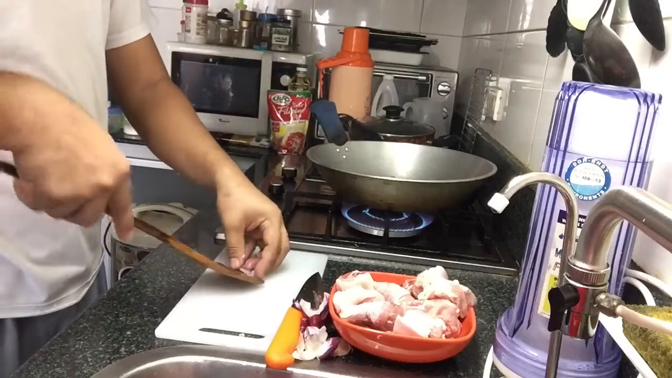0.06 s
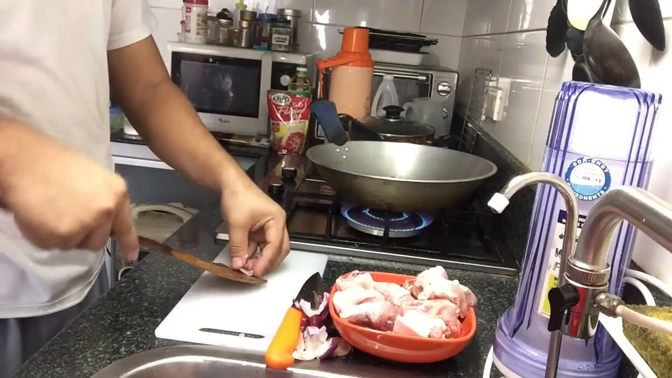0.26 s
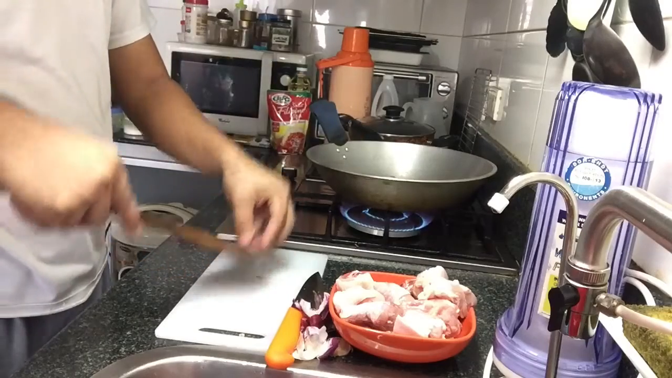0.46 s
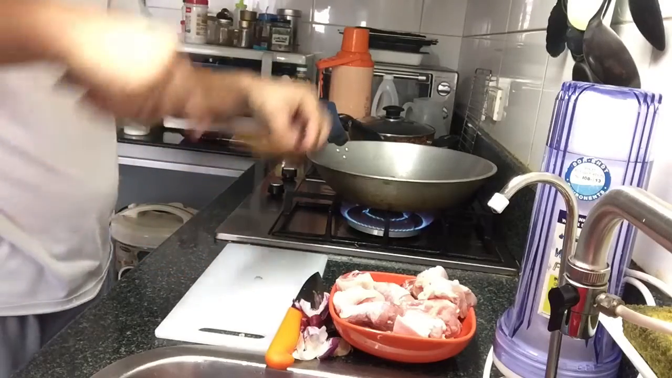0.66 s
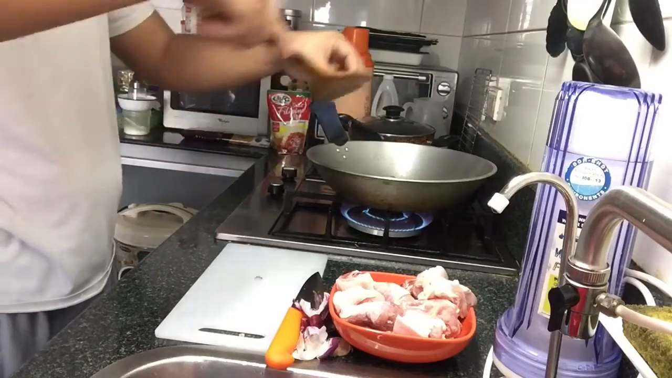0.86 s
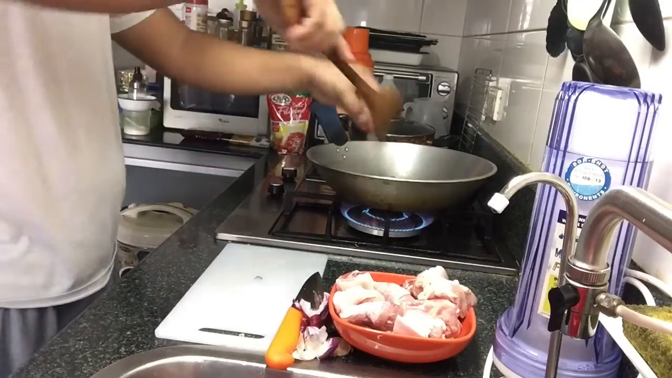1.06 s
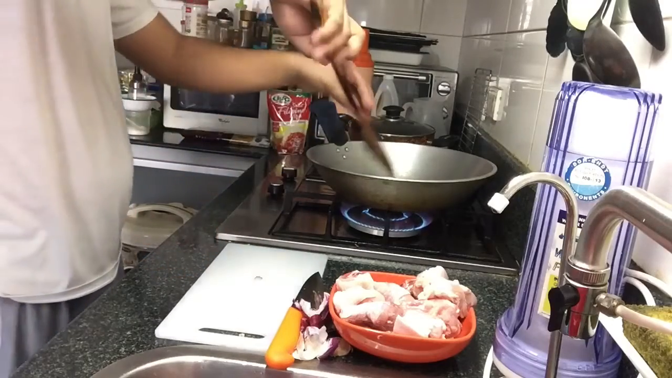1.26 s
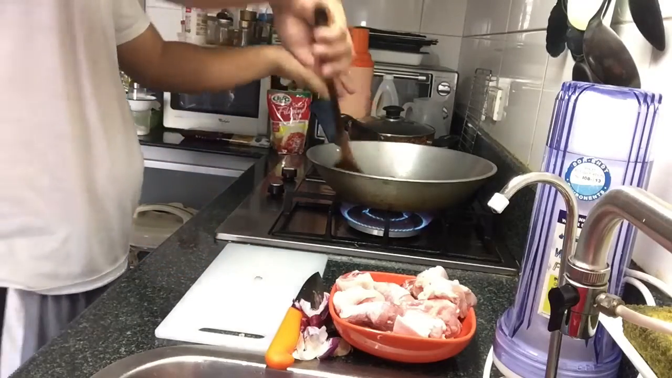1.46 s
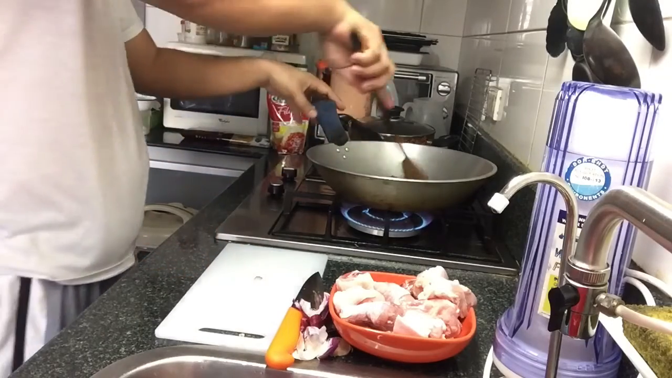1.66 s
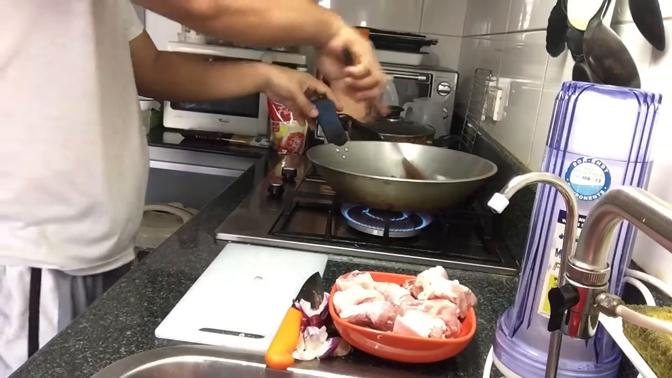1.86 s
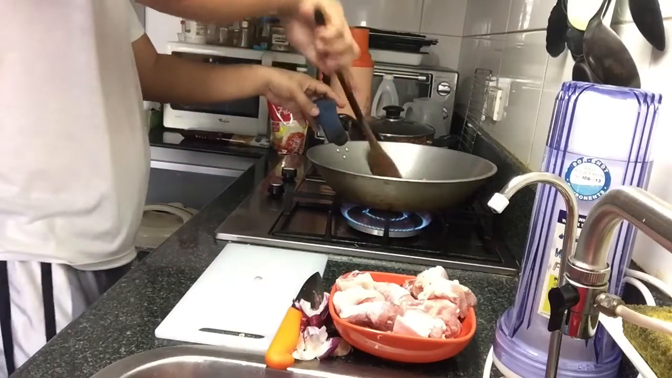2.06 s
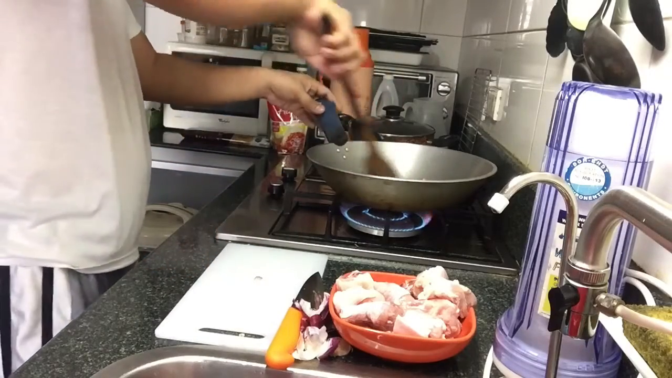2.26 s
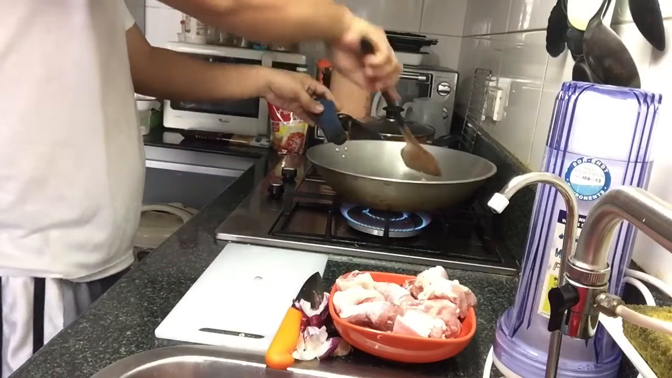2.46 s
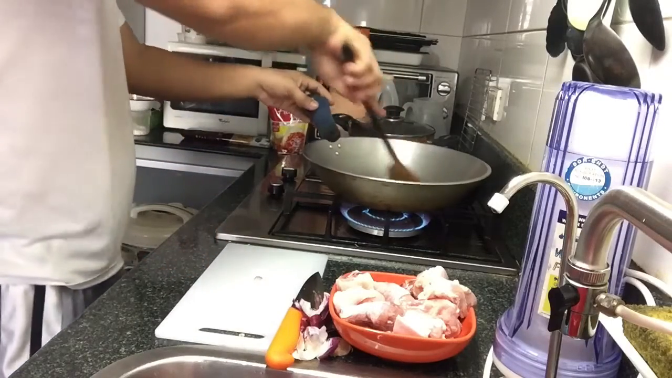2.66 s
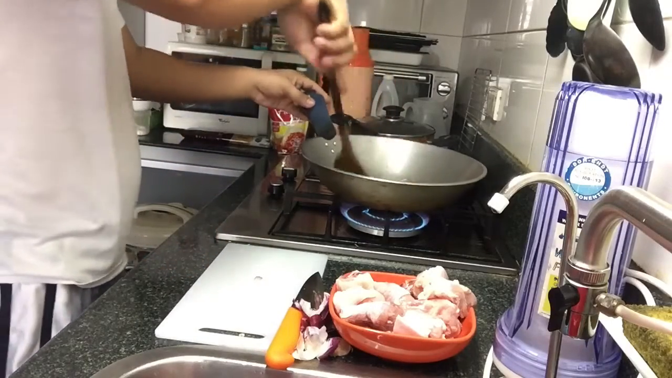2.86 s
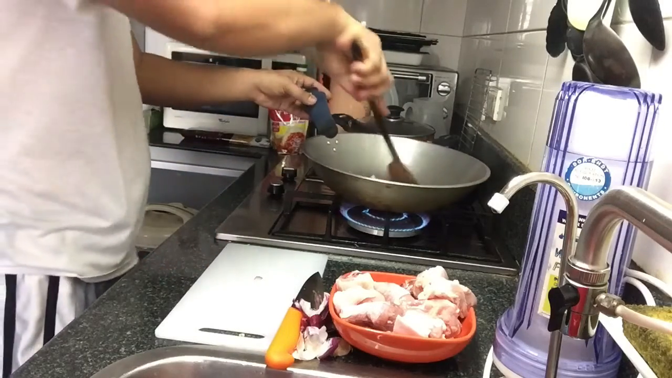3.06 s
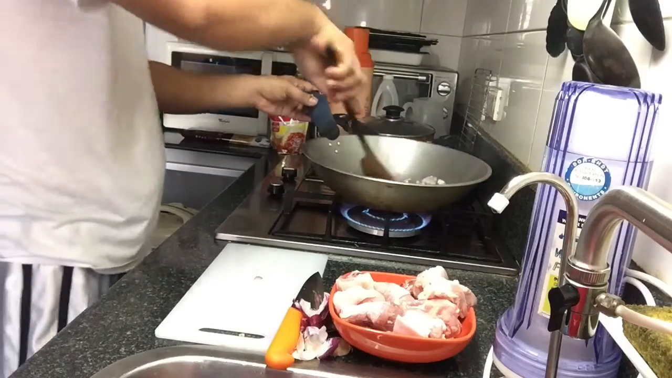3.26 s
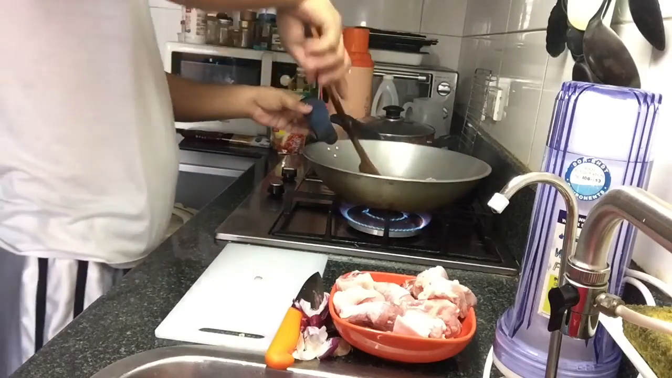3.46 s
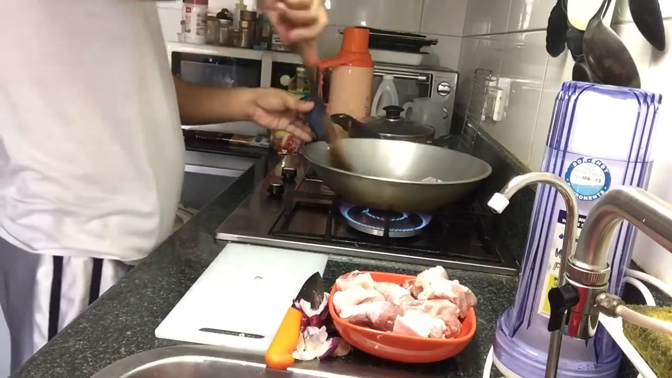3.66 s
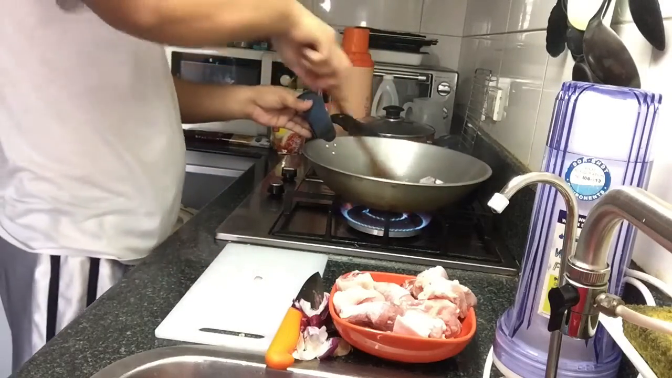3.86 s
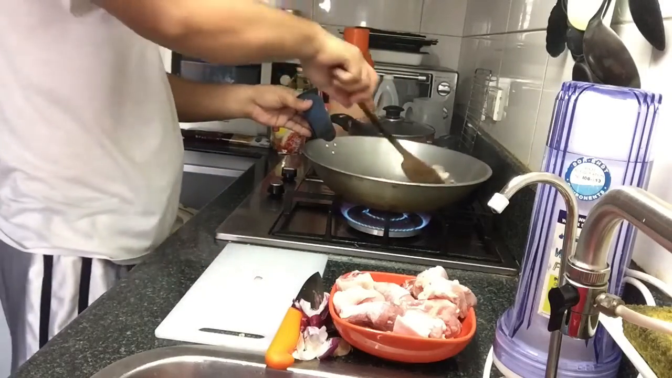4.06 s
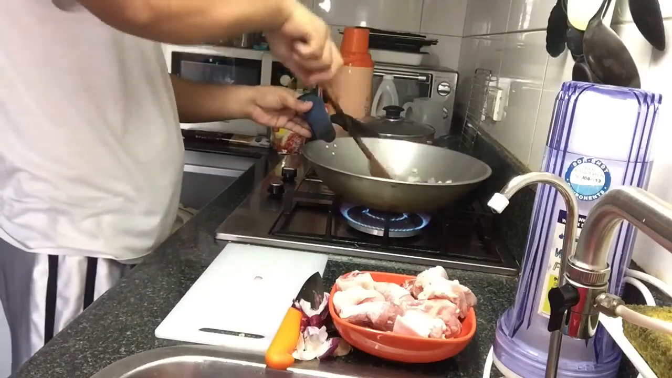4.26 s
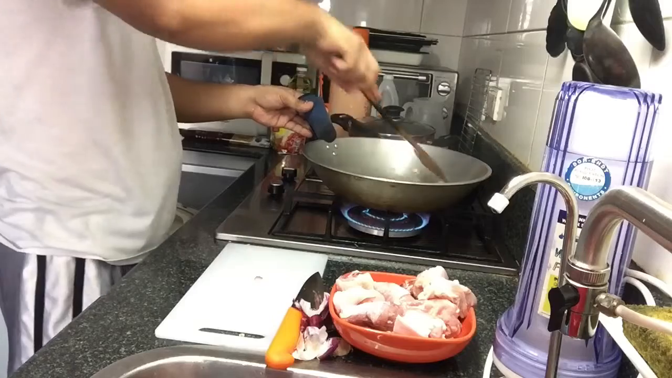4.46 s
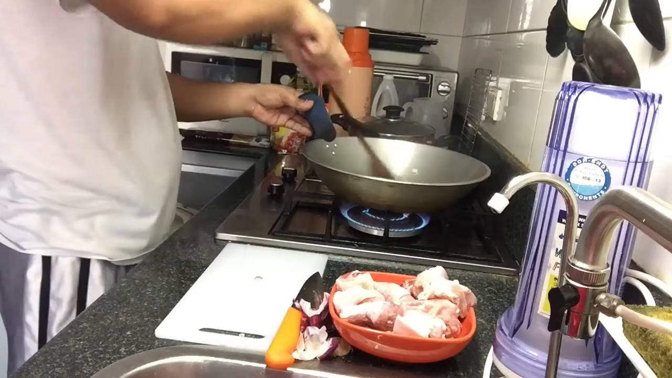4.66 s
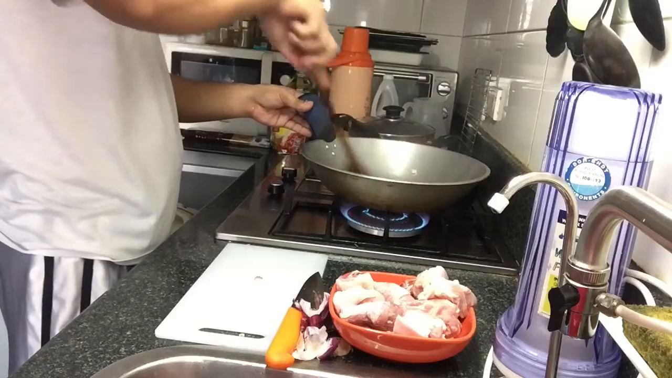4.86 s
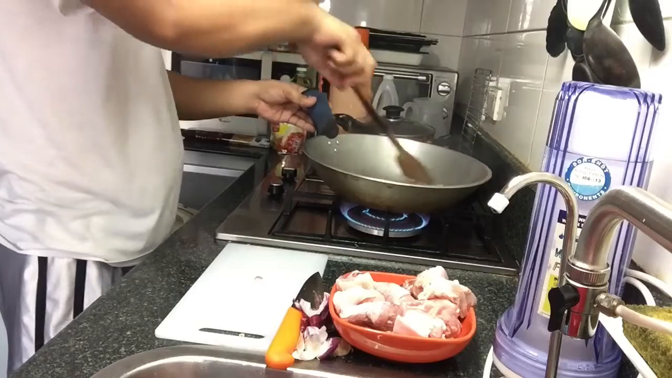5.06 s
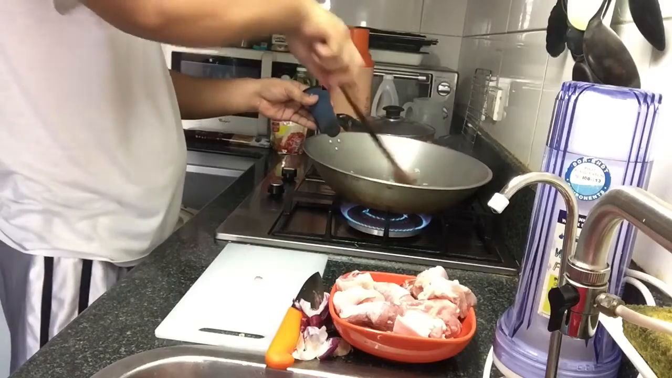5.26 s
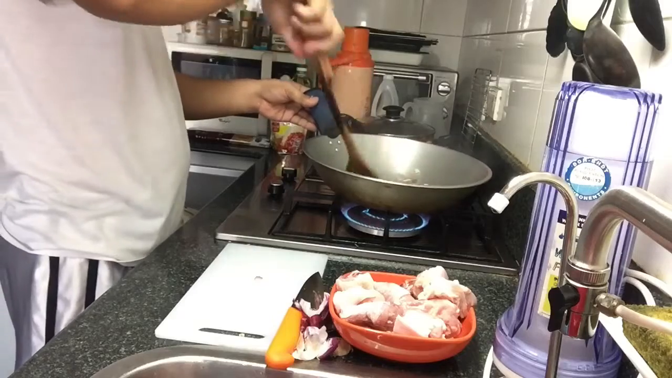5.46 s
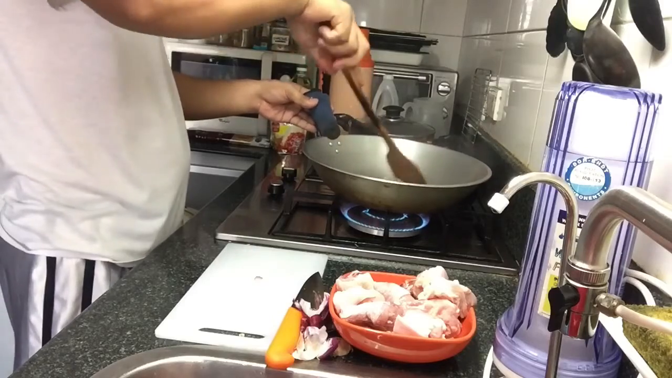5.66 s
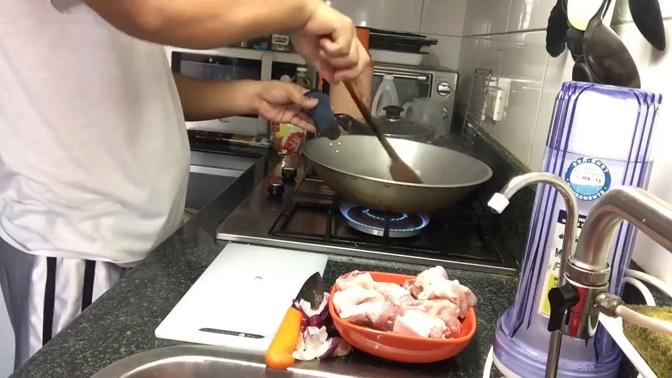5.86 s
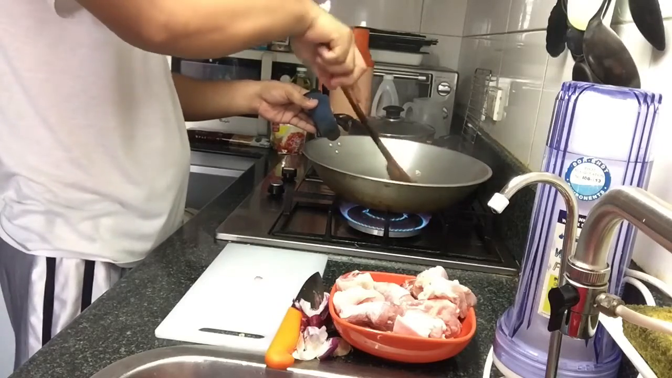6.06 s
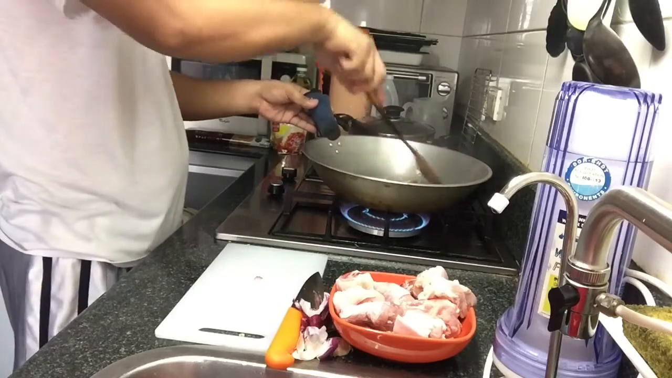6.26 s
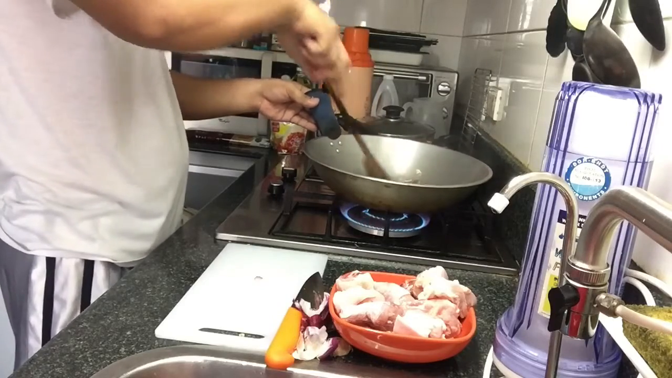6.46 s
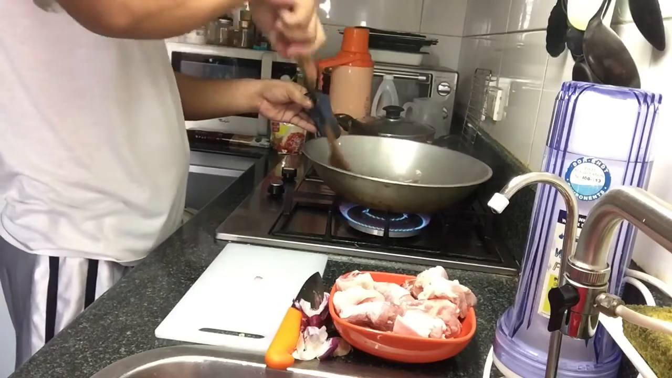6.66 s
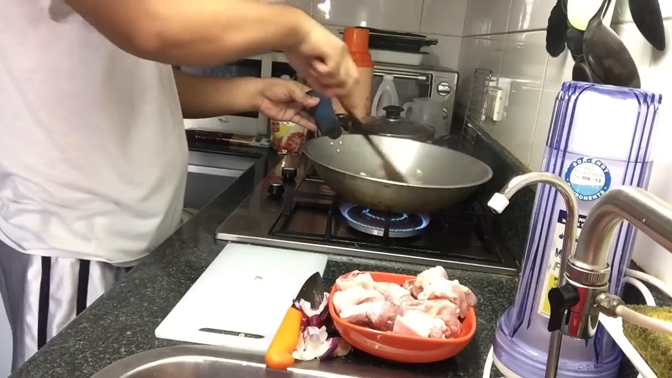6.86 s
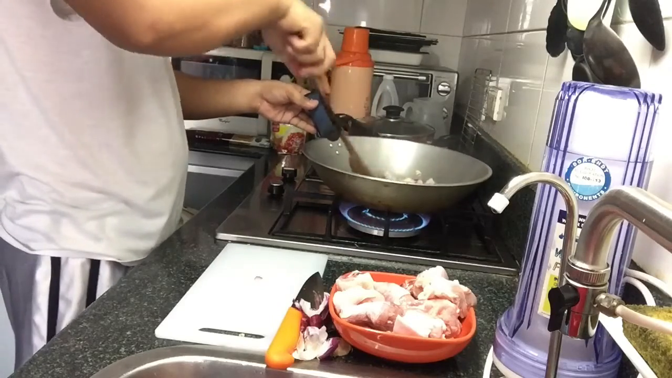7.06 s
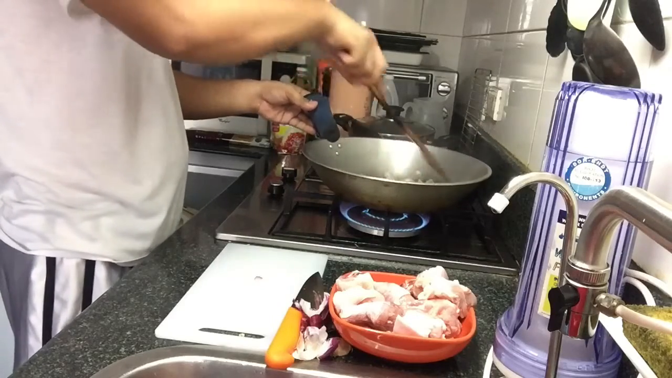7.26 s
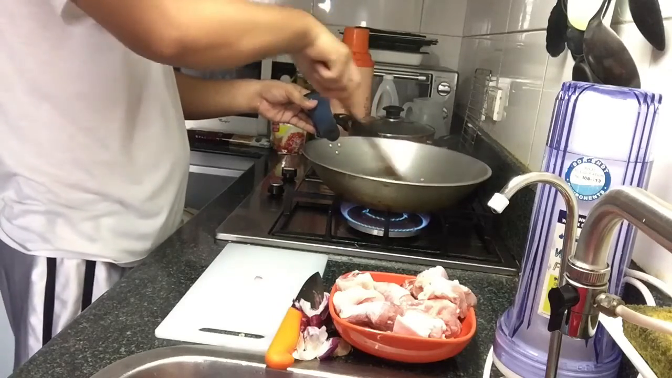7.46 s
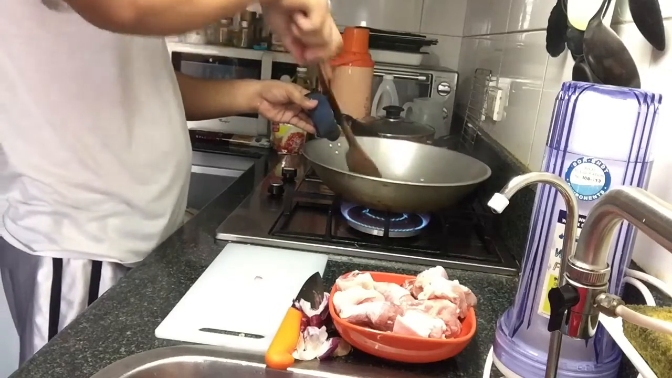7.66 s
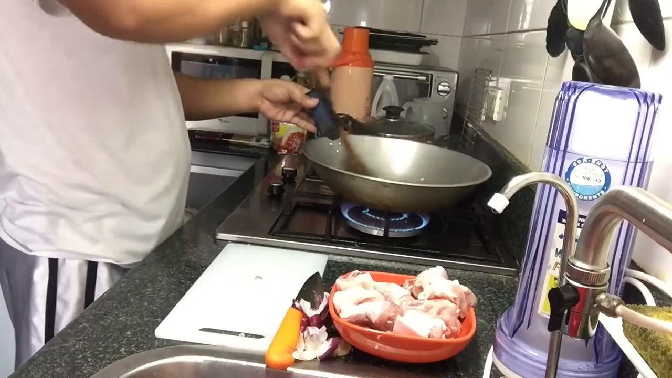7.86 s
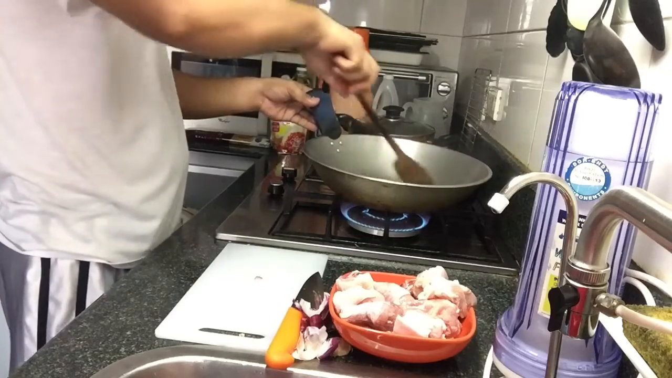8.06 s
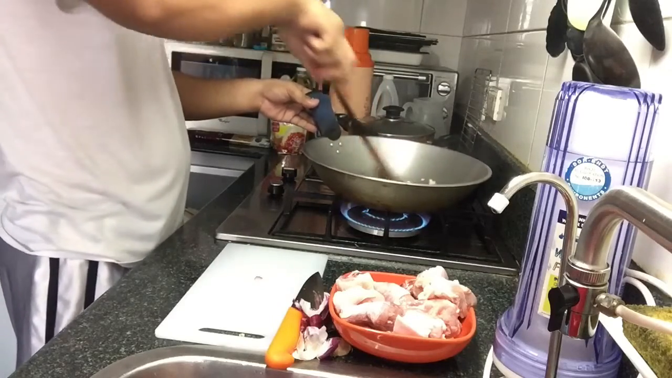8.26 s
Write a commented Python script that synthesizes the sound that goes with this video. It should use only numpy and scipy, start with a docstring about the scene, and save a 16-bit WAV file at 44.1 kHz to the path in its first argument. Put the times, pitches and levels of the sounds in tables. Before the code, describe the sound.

Hot oil sizzles brightly in a steel wok while a wooden spatula scrapes and knocks the pan over a gas burner.

```python
"""A bright sizzle of hot oil: chopped garlic and onion fry in a steel wok in a small tiled kitchen.
Countless steam bubbles burst, drops spit, and the frying flares as wet sides turn into the oil.
A wooden spatula taps the chopping board and a hand takes the wok's handle with a soft bump.
Then the spatula stirs, scrapes and knocks the wok, which rings and thuds on its support.
Underneath, the gas burner rumbles, an appliance hums and a faint whistle sets in."""
import sys
import numpy as np
from scipy import signal
from scipy.fft import rfft, irfft, next_fast_len
from scipy.io import wavfile
from scipy.ndimage import uniform_filter1d

SR = 44100
rng = np.random.default_rng(int(sys.argv[2]) if len(sys.argv) > 2 else 0)


def wrap_up_sound(samples):
    """Save the sound to the file named by the first command line argument, as 16-bit audio."""
    columns = np.atleast_2d(samples).T
    # keep every value between -1 and 1, then stretch to whole-number steps
    tamed = np.clip(columns, -1, 1)
    steps = np.round(tamed * 32767).astype(np.int16)
    wavfile.write(sys.argv[1], SR, steps)


N = 367353
TIME = np.arange(N) / SR

# Tone of the gas flame. Each row: frequency in Hz, relative level in dB.
FLAME_TONE = [(20, -46), (38, -16), (55, 3), (85, 0.5), (120, 5), (180, -1.5), (250, 0), (330, -14),
              (500, -23.5), (650, -6.5), (800, -32), (1100, -7.5), (1500, -56), (4000, -49)]
# Single drops spit; the snap at 0.14 s is instead the spatula tapping the board. Each row: start in seconds,
# relative level in dB, centre pitch in Hz.
SPITS = [(0.1446, -22, 5400), (0.515, -20, 7820), (0.543, -22, 7170), (0.9138, -27.5, 8110),
         (1.0256, -19, 9400), (1.0364, -22, 13500), (1.4134, -26, 7500), (1.6182, -23, 9000),
         (1.6994, -18, 15300), (2.086, -17.5, 5400), (4.0085, -14.5, 12300), (7.2844, -20.5, 12100)]
# Taps on the plastic board. Each row: start in seconds, level in dB, low and high band edges in Hz.
BOARD_TAPS = [(0.0527, -26, 1100, 5530), (0.386, -36.5, 90, 380)]
# Dry rubs of wood. Each row: middle in seconds, half-length in seconds, level in dB, centre pitch in Hz.
RUBS = [(1.182, .04, -40, 3200), (1.493, .08, -39.5, 2850), (1.719, 0.054, -42, 1300),
        (1.87, .05, -37, 4200), (4.812, 0.078, -35, 4470), (5.857, 0.044, -42.5, 2200),
        (6.156, .059, -42, 1270), (6.662, .045, -37.5, 3130), (6.702, .024, -34.5, 3360),
        (7.669, 0.045, -35, 3700), (7.99, 0.045, -34, 4540)]
# Modes of the wok on its support. Each row: pitch in Hz, relative level in dB, t60 in seconds.
WOK_MODES = [(60, 1, 0.22), (77, -4.5, 0.51), (112.9, 4, 0.53), (160.6, 1.5, 0.45), (191, -1, 0.39),
             (216, -3.5, 0.35), (242, -2.5, 0.13), (307.2, -9.5, 0.45), (385, -2, 0.18), (480, 0, 0.13),
             (565, -2, 0.084), (630, -5.5, 0.29), (662, -4, 0.27), (910, -25, 0.11), (908, -8, 0.2),
             (1046, -3, 0.18), (1156, -2.5, 0.12), (1236, -5, 0.33), (1425, -2.5, 0.26), (1542, -3.5, 0.38),
             (1782, -7, 0.24), (1960, 0, 0.24), (1980, -2.5, 0.13), (2100, -2, 0.057), (2310, -1.5, 0.15),
             (2920, 7.5, 0.07), (3230, -1, 0.56), (3510, -8, .25), (3520, 1, .3), (4130, 11.5, 0.13)]
# Spatula strokes over the steel. Each row: start and hold in seconds, relative scrape and judder in dB.
STROKES = [(1.535, 0.22, -44, -40.5), (2.03, 0.14, -49, -47), (2.555, 0.31, -45.5, -38.5),
           (3.062, 0.33, -44.5, -39), (3.514, 0.1, -34.5, -36), (3.672, 0.27, -56, -40.5),
           (4.713, 0.14, -48, -40), (4.97, 0.23, -48, -41), (5.328, 0.082, -46, -43),
           (5.624, 0.076, -50, -38.5), (5.94, 0.12, -48, -41.5), (6.297, .13, -49, -50),
           (6.46, .1, -45, -40), (6.863, .17, -41, -38.5), (7.08, 0.19, -48, -44.5),
           (7.525, 0.19, -45, -39.5), (7.95, 0.054, -52, -42.5)]
# Knocks on the wok: a soft bump as a hand takes the handle, then spatula blows.
# Each row: start in seconds, relative ring in dB, top of the ring in Hz,
# pitch that the struck spot favours in Hz, thud on the support in dB.
KNOCKS = [(0.682, -53, 680, 480, -55), (1.177, -54.5, 890, 480, -56), (1.581, -56, 1720, 662, -40.5),
          (2.028, -39.5, 1500, 662, -40), (2.714, -43.5, 880, 480, -43), (2.789, -44.5, 1000, 662, -44),
          (3.057, -29, 3450, 1782, -35.5), (3.527, -32.5, 2800, 1425, -31),
          (3.843, -31.5, 3100, 1425, -37.5), (4.699, -45, 736, 385, -40), (4.976, -45, 630, 385, -37.5),
          (5.327, -32, 1650, 662, -42.5), (5.627, -30, 3520, 3230, -36), (5.937, -52, 700, 242, -35.5),
          (6.44, -25.5, 1390, 1425, -40.5), (6.838, -30.5, 2720, 2100, -40.5),
          (7.508, -42.5, 850, 630, -45), (7.585, -41.5, 890, 662, -37.5), (7.928, -49, 910, 662, -48)]
# The tipped wok drops back. Each row: start in seconds, ring in dB, favoured pitch in Hz, thud in dB.
CLANKS = [(3.561, -30, 2310, -30.5), (3.565, -30, 2920, -42), (3.6, -42, 2310, -35),
          (3.631, -38, 2310, -31), (3.878, -39, 2920, -34)]
# Tone of the frying as it leaves the bowl. Each row: frequency in Hz, relative level in dB.
OIL_TONE = [(300, -24), (800, -17.5), (1500, -11), (2300, -10), (3200, -6), (4500, -4.5), (4950, -7),
            (5400, -3), (6800, 4.5), (7600, 2.5), (9800, 3.5), (10400, -1.5), (11200, 3.5), (15700, 2.5)]
# Wet sides turned into the oil flare up. Each row: start and hold in seconds,
# relative fizz of fine bubbles in dB, relative sputter of large bubbles in dB.
FLARES = [(0.033, 0.12, -38, -46), (2.018, 0.73, -33.5, -38), (2.875, 0.049, -30, -38),
          (3.067, 0.15, -37, -40), (3.97, 0.17, -31.5, -38), (4.325, 0.15, -30, -37),
          (4.573, 0.3, -33, -42.5), (5.28, 0.44, -33, -41.5), (6.99, 0.24, -36.5, -42),
          (7.6, 0.12, -37.5, -40.5), (7.963, .04, -36, -37)]
STIR_START_S = 1.384


def from_db(db):
    """Turns decibels into gain."""
    return 10 ** (np.asarray(db) / 20)


def unit(x):
    """Scales to an rms of one."""
    return x / np.sqrt(np.mean(x ** 2) + 1e-20)


def band(x, lo_hz, hi_hz, order=3):
    """Causal band-pass."""
    sos = signal.butter(order, [lo_hz, min(hi_hz, .49 * SR)], "band", fs=SR, output="sos")
    return signal.sosfilt(sos, x)


def equalise(x, points):
    """Applies an EQ curve drawn through (Hz, dB) points."""
    hz, db = np.transpose(points)
    size = next_fast_len(len(x))
    gain = from_db(np.interp(np.log(np.fft.rfftfreq(size, 1 / SR) + 1), np.log(hz), db))
    return irfft(rfft(x, size) * gain, size)[:len(x)]


def wander(per_s):
    """Random drift with an rms of one, gliding to per_s new values a second."""
    knots = rng.standard_normal(4000)
    return unit(np.interp(TIME * per_s, np.arange(len(knots)), knots))


def swell(start, hold, rise_s, fade_s):
    """Envelope that rises at start and dies away from start + hold."""
    t = TIME - start
    return np.clip(t / rise_s, 0, 1) * np.exp(-np.maximum(t - hold, 0) / fade_s)


def impulses(count, per_s):
    """Clicks of random size at random moments."""
    return rng.standard_normal(count) * (rng.random(count) < per_s / SR)


def add(mix, start_s, sound):
    """Mixes a sound in from start_s."""
    part = mix[max(round(start_s * SR), 0):][:len(sound)]
    part += sound[:len(part)]


def kitchen(x, t60, wet_db):
    """Adds the dense reflections of tiles and worktop."""
    t = np.arange(SR // 2) / SR
    echoes = impulses(len(t), per_s=6615) * (t > .002) * from_db(-60 * t / t60)
    return x + from_db(wet_db) * signal.fftconvolve(x, echoes / np.linalg.norm(echoes))[:len(x)]


def stove(flame_db=-50, hum_db=-52, hum_hz=121.9, whistle_db=-54.5, whistle_hz=1120, growth_db_per_s=0.1):
    """The bed: a fluttering flame, an appliance's mains hum and an airy whistle, likely the burner's."""
    flame = unit(equalise(rng.standard_normal(N), FLAME_TONE)) * from_db(flame_db + wander(14))
    hum = unit(np.sin(2 * np.pi * hum_hz * TIME)) * from_db(hum_db + 3.1 * wander(16))
    cycles = np.cumsum(whistle_hz + 7 * wander(130)) / SR
    air = unit(band(rng.standard_normal(N), 900, 1380, order=2))
    whistle = unit(np.sin(2 * np.pi * cycles)) * from_db(wander(45)) + from_db(-7) * air
    whistling_s = TIME - 0.64
    fade_in = np.clip(whistling_s / .07, 0, 1)
    return flame + hum + whistle * fade_in * from_db(whistle_db + growth_db_per_s * whistling_s)


def crack(db, lo_hz, hi_hz, t60):
    """A snap with no ring: a band of noise that falls away from db."""
    t = np.arange(SR // 5) / SR
    return unit(band(rng.standard_normal(len(t)), lo_hz, hi_hz, order=2)) * from_db(db - 60 * t / t60)


def spits_and_taps(spit_trim_db=-7, width=1.3):
    """Drops of water flash to steam in the oil, and the spatula taps the chopping board."""
    out = np.zeros(N)
    for start, db, hz in SPITS:
        add(out, start, crack(db + spit_trim_db, hz / width, hz * width, t60=0.047))
    for start, db, lo_hz, hi_hz in BOARD_TAPS:
        add(out, start, crack(db, lo_hz, hi_hz, t60=0.05))
    return kitchen(out, t60=0.19, wet_db=-4.0)


def rubs(width=1.29):
    """The dry wooden edge skids: brief swells of fast, fine slips."""
    out = np.zeros(N)
    for middle, half_length, db, hz in RUBS:
        count = int(2 * half_length * SR)
        slips = impulses(SR, per_s=3000)[:count]
        skid = unit(band(slips, hz / width, hz * width, order=2))
        add(out, middle - half_length, from_db(db) * skid * np.hanning(count) ** 2)
    return out


def wok_ring(favoured_hz, favour_db, clatter_db, clatter_t60):
    """One tap: the steel's modes, weighted by the spot that is hit, and a dull clatter between tiles."""
    t = np.arange(SR // 2) / SR
    hz, db, t60 = np.transpose(WOK_MODES)
    modes = from_db(db[:, None] - 60 * t / t60[:, None]) * np.sin(2 * np.pi * hz[:, None] * t)
    spot_db = favour_db * np.exp(-(np.log(hz / favoured_hz) / 0.052) ** 2) + rng.standard_normal(len(hz))
    clatter = band(rng.standard_normal(len(t)), 50, 3900, order=1)
    clatter *= from_db(clatter_db - 60 * t / clatter_t60)
    return (rng.choice([-1, 1], len(hz)) * from_db(spot_db)) @ modes + clatter


def scraping(scrape_trim_db=-1, judder_trim_db=-2, press_s=0.03, release_s=0.059):
    """The spatula sticks and slips; the slips ring the wok and shake it on its support."""
    touching = np.clip((TIME - STIR_START_S) / press_s, 0, 1)
    drag, shake = touching * from_db(-58), touching * from_db(-54)  # light contact between strokes
    for start, hold, drag_db, shake_db in STROKES:
        pressure = swell(start, hold, press_s, release_s)
        drag = np.maximum(drag, pressure * from_db(drag_db))
        shake = np.maximum(shake, pressure * from_db(shake_db))
    slips = impulses(N, per_s=2500) * from_db(3.0 * wander(30))
    steel = signal.oaconvolve(slips, wok_ring(470, favour_db=1.0, clatter_db=7, clatter_t60=0.14))[:N]
    scrape = unit(band(band(steel, 450, 9000, order=2), 250, 1260, order=1))
    judder = unit(band(steel, 66, 343, order=2))  # the support passes only the lows
    return scrape * drag * from_db(scrape_trim_db) + judder * shake * from_db(judder_trim_db)


def blow(favoured_hz, lo_hz, hi_hz, ring_db, thud_db, clatter_db, contact_s=0.0021):
    """One blow rings the wok between two pitches and rocks it with a thud."""
    tap = wok_ring(favoured_hz, favour_db=6.5, clatter_db=clatter_db, clatter_t60=0.48)
    t = TIME[:len(tap)]
    tap *= 1 - np.exp(-t / contact_s)  # the contact loads the steel gradually
    ring = band(band(tap, lo_hz, 14000, order=2), 140, hi_hz, order=5)
    ring *= from_db(-6 * np.minimum(t / 0.055, 1))  # lingering contact damps the steel
    thud = band(tap, 38, 308)
    ring_attack, thud_attack = np.std(ring[:SR // 30]), np.std(thud[:SR // 20])
    return from_db(ring_db) * ring / ring_attack + from_db(thud_db) * thud / thud_attack


def knocks(ring_trim_db=.5, bass_hz=175, clank_width=1.27):
    """Knocks ring many modes, the brighter the thinner in the bass; when the wok drops back on its support, it
    rings a few high ones."""
    out = np.zeros(N)
    for start, ring_db, hi_hz, favoured_hz, thud_db in KNOCKS:
        lo_hz = np.sqrt(bass_hz * hi_hz)
        add(out, start, blow(favoured_hz, lo_hz, hi_hz, ring_db + ring_trim_db, thud_db, clatter_db=13))
    for start, ring_db, hz, thud_db in CLANKS:
        add(out, start, blow(hz, hz / clank_width, hz * clank_width, ring_db, thud_db, clatter_db=11))
    return out


def bubbles(per_s, lo_hz, hi_hz, spread_db, decay_cycles, pitches=12):
    """Bursting bubbles: tiny damped pings of many pitches, most faint, a few loud."""
    size_db = spread_db * np.minimum(rng.exponential(1, N), 4)
    bursts = (rng.random(N) < per_s / SR) * rng.choice([-1, 1], N) * from_db(size_db)
    pitch_index = rng.integers(0, pitches, N)
    out = np.zeros(N)
    for k, hz in enumerate(np.linspace(lo_hz, hi_hz, pitches)):
        decay = np.exp(-hz / decay_cycles / SR)
        feedback = decay * np.cos(2 * np.pi * hz / SR)
        pings = signal.lfilter([1, -feedback], [1, -2 * feedback, decay ** 2], bursts * (pitch_index == k))
        out += np.sqrt(1 - decay ** 2) * pings
    return unit(out)


def flurries(per_s, depth_db, fade_s, step=64):
    """Gain of clumps of bubbles that break out at once and die down."""
    count = N // step + 1
    onsets = (rng.random(count) < per_s * step / SR) * rng.uniform(.5, 1, count)
    clumps = signal.lfilter([1], [1, -np.exp(-step / SR / fade_s)], onsets)
    return from_db(depth_db * np.repeat(unit(clumps - clumps.mean()), step)[:N])


def frying_level(spread_s=0.48, settling_db_per_s=1.6, drying_db_per_s=0.29):
    """The food quietens while it lies still, picks up when stirred through the oil, then dries out."""
    stirring_s = TIME - STIR_START_S
    spread = np.clip(stirring_s / spread_s, 0, 1)
    still_db = -35.5 - settling_db_per_s * TIME
    stirred_db = -30.5 - drying_db_per_s * stirring_s
    return from_db((1 - spread) * still_db + spread * stirred_db)


def sizzle(fizz_trim_db=0.12, sputter_offset_db=-6.5, hiss_db=5):
    """Steam bubbles burst in flurries over a smooth hiss; the harder the food fries, the more of them."""
    frying = frying_level()
    sputtering = frying * from_db(sputter_offset_db)
    for start, hold, fizz_db, sputter_db in FLARES:
        flare = swell(start, hold, rise_s=0.028, fade_s=.08)
        frying = np.hypot(frying, from_db(fizz_db) * flare)
        sputtering = np.hypot(sputtering, from_db(sputter_db) * flare)
    bursts_per_s = 13000 * frying / frying.max()
    grains = bubbles(bursts_per_s, lo_hz=2440, hi_hz=14500, spread_db=3.5, decay_cycles=0.52)
    grains /= np.sqrt(uniform_filter1d(grains ** 2, SR // 6) + 1e-9)  # density sets texture, not level
    oil = kitchen(grains, t60=0.064, wet_db=1.0) + from_db(hiss_db) * rng.standard_normal(N)
    oil = equalise(oil, OIL_TONE) * flurries(per_s=45, depth_db=0.6, fade_s=0.017)
    oil /= np.std(band(oil, 5500, 15500))
    # large, middling and fine bubbles also come in flurries of their own
    large = equalise(oil, [(4300, -7), (5600, -8.5), (8000, -40)])
    fine = equalise(oil, [(6000, -48), (9000, -8), (10500, 3.5)])
    middling = oil - large - fine
    fizz = middling * flurries(per_s=52, depth_db=1.03, fade_s=0.01)
    fizz += fine * flurries(per_s=61, depth_db=0.5, fade_s=0.0058)
    sputter = unit(large) * flurries(per_s=36, depth_db=1.16, fade_s=0.035)
    return frying * from_db(fizz_trim_db) * fizz + sputtering * sputter


def scene():
    """The sizzle up front, wok, spatula and stove behind it, the same in both channels."""
    mix = sizzle() + spits_and_taps() + knocks() + scraping() + rubs() + stove()
    return np.tile(mix, (2, 1))


def record(dry):
    """A steep low-pass takes off the very top of the treble."""
    low_pass = signal.firwin(801, cutoff=15780, window=("kaiser", 9), fs=SR)
    return signal.oaconvolve(dry, low_pass[None], "same")


dry = scene()
out = record(dry)
wrap_up_sound(out)
```